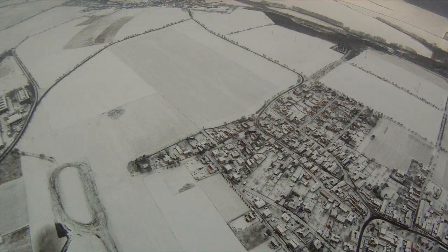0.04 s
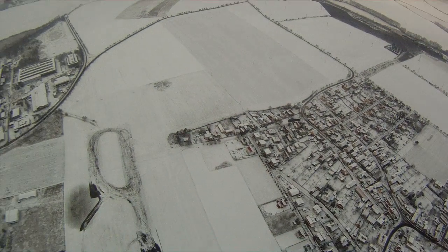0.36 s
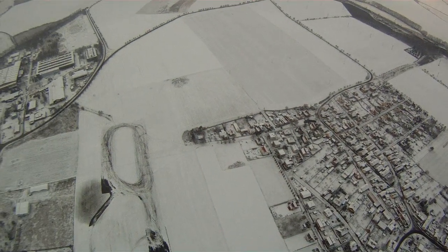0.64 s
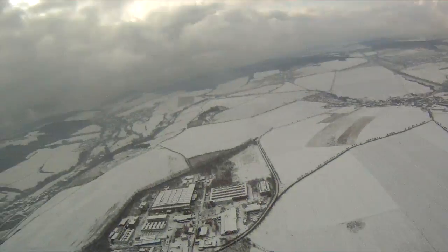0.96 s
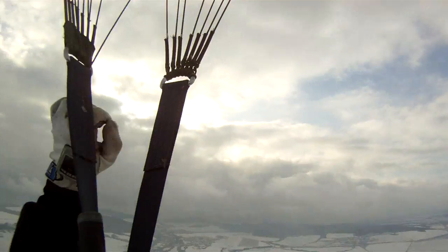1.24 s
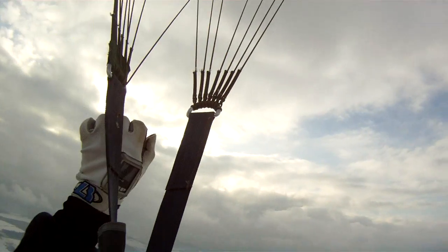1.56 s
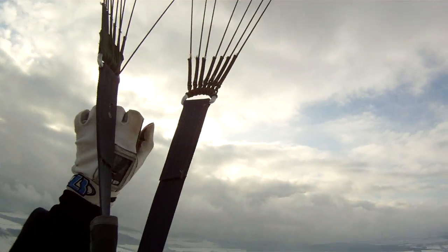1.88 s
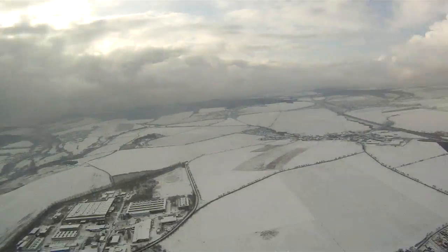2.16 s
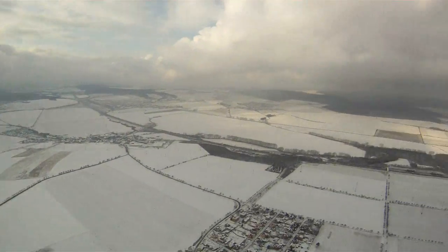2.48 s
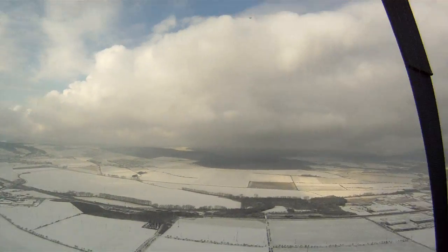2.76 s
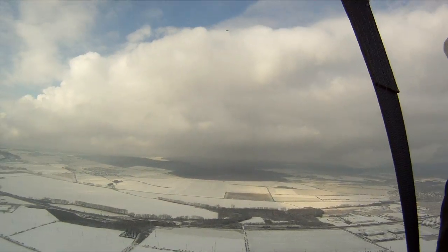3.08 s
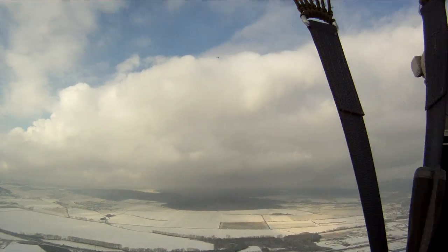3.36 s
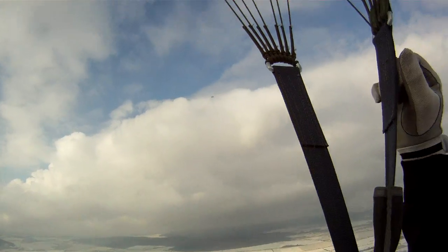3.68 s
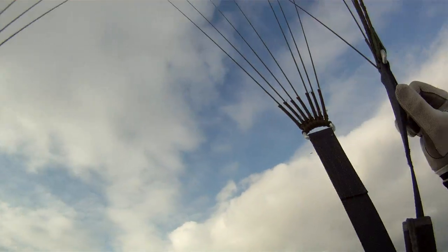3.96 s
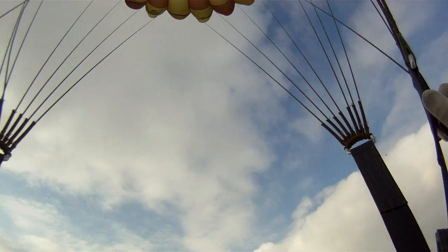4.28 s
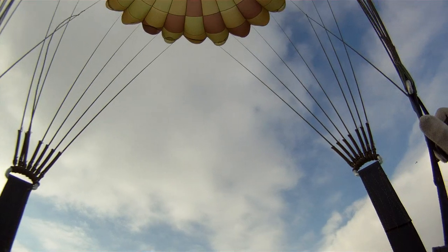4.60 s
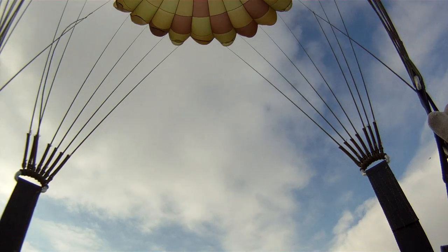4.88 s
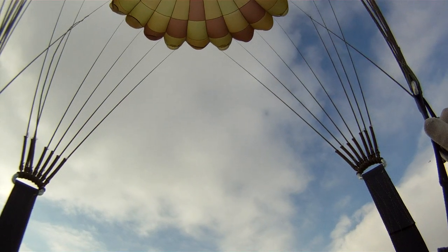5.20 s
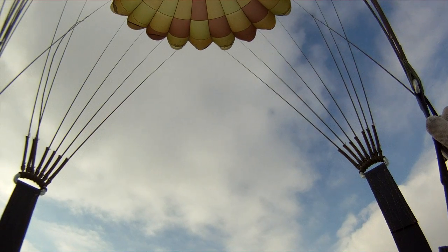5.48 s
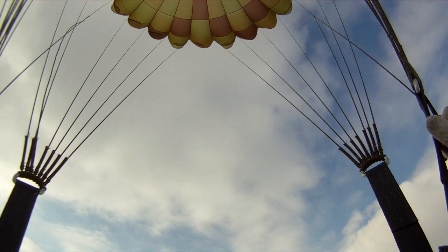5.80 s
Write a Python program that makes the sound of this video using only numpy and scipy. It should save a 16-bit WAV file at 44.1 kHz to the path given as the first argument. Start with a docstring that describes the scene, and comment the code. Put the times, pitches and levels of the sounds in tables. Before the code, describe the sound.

Gentle wind rumbles against an enclosed helmet microphone during a parachute glide, with no echo. Light jacket rustles, little strap snaps and tiny metal ticks come and go, and a far aircraft hums very faintly underneath. About four seconds in, gear knocks on the helmet and the airstream hits much harder, thumping, fluttering and hissing in two close surges before settling back to a soft rumble.

```python
"""A jacket rustles and straps snap over a soft rumble of air and a far aircraft's drone: a jumper
glides under an open parachute, heard from a camera in a closed housing on the helmet.
The cloth sounds by stick-slip friction as the head turns. When the head tips back, the airstream
catches the housing in two bursts: eddies buffet it with slow swings of pressure, and faster
turbulence drives the resonances of its shell into a rushing hiss."""
import sys
import numpy as np
from scipy import signal
from scipy.fft import rfft, irfft
from scipy.io import wavfile
from scipy.ndimage import uniform_filter1d

SR = 44100
rng = np.random.default_rng(int(sys.argv[2]) if len(sys.argv) > 2 else 0)


def transcribe(signal):
    """Save signal, clipped to [-1, 1], as a 16-bit WAV file at the path in sys.argv[1]."""
    frames = np.atleast_2d(signal).T
    limited = np.clip(frames, -1, 1)
    pcm = np.round(limited * 32767).astype(np.int16)
    wavfile.write(sys.argv[1], SR, pcm)


N = 257544
TIME = np.arange(N) / SR

# Gusts catching the housing; the last three levels are relative to the rush:
# (time of full strength [s], hold [s], rush level [dB], edge hiss [dB], hollow [dB], boom [dB])
GUST_EVENTS = [(0.952, .1, -60.5, -13, -3.5, 15.5), (3.757, 0.073, -59.5, -3, -8, 4),
               (3.878, 0.059, -46.5, -2.5, -1, 17.5), (3.961, 0.17, -52, 1.5, 0.5, 25),
               (4.145, 0.04, -53, -11, -3, 23), (4.332, 0.17, -57, -22, 5.5, 28),
               (4.394, 0.071, -46, -17.5, -3.5, 18), (4.629, .13, -57, -9.5, -4, 19)]
GUST_ATTACK_S, RUSH_RELEASE_S, RUSH_SAG_DB_PER_S = 0.035, 0.048, 13
BOOM_RELEASE_S, BOOM_SAG_DB_PER_S = 0.063, 17   # low turbulence eases sooner and lingers longer
GUST_EDDY_DB = -2.5   # slow eddies relative to the boom
# Breeze on the housing, stronger once the head is tipped back: (time [s], base level [dB])
BREEZE_CURVE = [(0, -53), (.16, -60), (.27, -48), (.55, -55), (.7, -46.5), (1.05, -46.5), (1.8, -51),
                (2.3, -47), (3.6, -49.5), (5.0, -43), (5.84, -46)]
BREEZE_EDDY_DB, BREEZE_BOOM_DB, EDDY_SPREAD_DB = -1.16, -4.5, 1.45   # relative to the base level
# Pitch of the boom, dropping as the head tips back: (time [s], frequency [Hz])
BOOM_CURVE = [(3.6, 105.1), (4.45, 96.1), (4.9, 88.86)]
# Vortex shedding, slowing as the gust eases: (time [s], level [dB], shedding rate [Hz])
SHEDDING_CURVE = [(3.84, -42.5, 159.2), (3.91, -32.5, 201), (3.96, -41, 184.7), (4.015, -32.5, 152),
                  (4.15, -43.5, 145.3), (4.26, -66, 137)]
# Single large eddies: (centre time [s], envelope peak [dB], frequency [Hz], half length [s])
BUFFET_EVENTS = [(.955, -40.5, 101, 0.019), (3.833, -9.5, 40.7, 0.0083), (3.866, -20.5, 22, 0.028),
                 (3.871, -15, 122, 0.016), (4.155, -12, 94.8, 0.014), (4.385, -15.5, 88.4, 0.0085),
                 (4.409, -16.5, 91.5, 0.011), (4.467, -22, 103, 0.012)]
# Rubs of the jacket: (time [s], hold [s], ring level [dB], ring centre [Hz], scratch re ring [dB])
JACKET_RUBS = [(0, 0.15, -63.5, 2310, 3.5), (.19, .29, -60.5, 2290, -.5), (0.523, 0.71, -72, 2240, 6),
               (.953, .075, -53, 2072, -6.5), (1.996, .05, -66, 2180, 0.5), (2.22, .09, -62, 2250, 0),
               (2.339, 0.21, -67, 2130, -4), (2.586, 0.31, -62.5, 2102, -5), (2.979, .5, -73.5, 2140, -10)]
RUB_ATTACK_S, RUB_RELEASE_S = 0.022, 0.0359

# Brief contacts: (time [s], peak level [dB])
STRAP_SNAPS = [(.072, -51), (.095, -45), (.224, -51), (.258, -44), (.298, -41.5), (.303, -44), (.342, -47),
               (.438, -51), (2.054, -47.5), (2.197, -46), (2.777, -48.5), (2.891, -47), (3.819, -39.5),
               (4.32, -52)]   # fabric and straps snapping
LINK_TICKS = [(1.072, -51.5), (2.383, -53), (2.453, -49), (3.82, -42), (4.967, -56)]   # small metal links of the harness
HELMET_KNOCKS = [(.181, -47.5), (1.521, -47.5), (3.871, -26)]   # gear against the helmet

# Resonances of the housing under each excitation: (frequency [Hz], width per pass [Hz], gain [dB])
EDDY_RESONANCES = [(24.2, 36, -5), (53.2, 19.5, -9)]
SHELL_RESONANCES = [(1162, 137, 1.5), (1500, 170, -3.5), (2040, 235, 2.5), (2197, 200, 3), (2580, 106, -8),
                    (3450, 380, -37), (4110, 480, -15), (4620, 250, -17), (4870, 240, -13.5)]
HOLLOW_RESONANCES = [(354, 110, -10), (658, 146, 1.5)]
EDGE_RESONANCES = [(2590, 280, -5), (3430, 240, -2.5), (4115, 160, -9), (4690, 200, -11.5), (4926, 210, -8),
                   (5200, 320, -18)]
CLOTH_RESONANCES = [(1194, 200, -4), (1287, 610, 1), (1800, 440, -12), (2550, 79, -4), (3580, 310, -11.5)]
SNAP_RESONANCES = [(1220, 330, -2), (2230, 350, 5), (3600, 750, -8.5), (4930, 520, -37)]
TICK_RESONANCES = [(3380, 1000, -2), (5300, 420, 1)]
KNOCK_RESONANCES = [(368, 200, 12), (742, 200, 17.5), (1180, 640, 13.5), (1970, 330, 7), (3400, 540, -22)]

# Smooth spectra of flow noise: (frequency [Hz], relative spectral density [dB])
CHURN_SPECTRUM = [(200, -19), (350, 0), (550, -7.5), (950, -6.5), (1700, -9.5), (2500, -24), (3000, -38),
                  (5500, -20)]   # fast air breaking up
WASH_SPECTRUM = [(130, 0), (200, -6.5), (260, -10.5), (350, -12.5), (520, -11.5), (620, -16.5), (780, -16),
                 (960, -19), (1170, -15), (1780, -23), (2250, -22.5), (2900, -26), (5200, -29), (6000, -31)]   # the even wash of the glide
WASH_START_DB, WASH_EASE_DB_PER_S = -57, 0.27
# Engine and propeller lines of the far aircraft: (frequency [Hz], mean level [dB])
AIRCRAFT_LINES = [(93.7, -60.5), (187.5, -65.5), (280.3, -70.5), (373, -77.5), (467, -78), (525, -86.5),
                  (543.5, -80), (678, -78.5)]
HOLD_HZ, CUTOFF_HZ = 12000, 15100   # the camera's sampling rate; upper limit of its output


def wind():
    """Turbulent pressure rocks the housing and makes it boom; vortex shedding adds a flutter."""
    _, _, rush_db, _, _, boom_db = np.transpose(GUST_EVENTS)
    breeze_db, = in_time(BREEZE_CURVE)
    boom_hz, = in_time(BOOM_CURVE)
    flutter_db, shedding_hz = in_time(SHEDDING_CURVE)
    gusts = gust_gain(rush_db + boom_db, BOOM_RELEASE_S, BOOM_SAG_DB_PER_S)
    uneven_breeze = from_db(breeze_db + BREEZE_EDDY_DB + EDDY_SPREAD_DB * drift(4.3))
    eddy_gain = np.hypot(uneven_breeze, from_db(GUST_EDDY_DB) * gusts)
    boom_gain = np.hypot(from_db(breeze_db + BREEZE_BOOM_DB), gusts)
    flutter_gain = during(SHEDDING_CURVE) * from_db(flutter_db)
    eddies = eddy_gain * evened(low_noise(EDDY_RESONANCES, top_hz=94.84), window_s=0.2)
    boom = boom_gain * evened(moving_ring(boom_hz, half_width_hz=15.6), window_s=0.073)
    flutter = flutter_gain * evened(moving_ring(shedding_hz, half_width_hz=22), window_s=0.055)
    return eddies + boom + flutter


def buffets():
    """A large passing eddy is a wave packet: the pressure swings for a cycle or a few."""
    pressure = np.zeros(N)
    for centre_s, db, hz, half_s in BUFFET_EVENTS:
        t = TIME - centre_s
        envelope = from_db(db) * np.exp(-(t / half_s) ** 2)
        pressure -= envelope * np.sin(2 * np.pi * hz * t)
    return pressure


def rush():
    """Forced resonance: fast air rings the shell and its hollow, breaks up and hisses on an edge."""
    _, _, rush_db, edge_db, hollow_db, _ = np.transpose(GUST_EVENTS)
    shell = unit_rms(body(turbulence(spread_db=1.6, rate_hz=19), SHELL_RESONANCES))
    hollow = evened(body(rng.standard_normal(N), HOLLOW_RESONANCES), window_s=0.058)
    churn = coloured(turbulence(spread_db=-1.5, rate_hz=44), CHURN_SPECTRUM)
    edge = unit_rms(body(turbulence(spread_db=2.0, rate_hz=15), EDGE_RESONANCES))
    return sum(gust_gain(rush_db + db, RUSH_RELEASE_S, RUSH_SAG_DB_PER_S) * layer
               for db, layer in [(0, shell), (hollow_db, hollow), (edge_db, edge + churn)])


def jacket_rustle():
    """Stick-slip friction: cloth moves in tiny jerks, and its ring shifts with each rub's contact."""
    _, _, _, ring_hz, scratch_db = np.transpose(JACKET_RUBS)
    rub_power = np.array([from_db(db) * swell(full_s, hold_s, RUB_ATTACK_S, RUB_RELEASE_S)
                          for full_s, hold_s, db, *_ in JACKET_RUBS]) ** 2
    ring_power = rub_power.sum(axis=0)
    scratch_power = from_db(scratch_db) ** 2 @ rub_power
    centre_hz = ring_hz @ rub_power / ring_power   # the strongest rub leads the pitch
    slips = unit_rms(from_db(2.4 * drift(140)))
    core = moving_ring(centre_hz, half_width_hz=68)
    skirt = from_db(-1.0) * moving_ring(centre_hz, half_width_hz=300)
    ring = unit_rms(core + skirt)
    scratch = unit_rms(body(rng.standard_normal(N), CLOTH_RESONANCES))
    return slips * (np.sqrt(ring_power) * ring + np.sqrt(scratch_power) * scratch)


def impacts(events, modes, decay_s):
    """Impact excitation: each contact sends a short, dying noise into the housing's resonances."""
    out, size = np.zeros(N), SR // 10
    decay = np.exp(-np.arange(size) / (decay_s * SR))
    for time_s, db in events:
        hit = body(rng.standard_normal(size) * decay, modes)
        start = int(time_s * SR)
        out[start:start + size] += from_db(db) * hit / np.abs(hit).max()
    return out


def air_wash():
    """Broadband flow noise: gliding through the air makes an even wash that slowly eases."""
    gain = from_db(WASH_START_DB - WASH_EASE_DB_PER_S * TIME)
    return gain * coloured(turbulence(spread_db=0.67, rate_hz=140), WASH_SPECTRUM)


def aircraft(waver_hz, fading_db):
    """Atmospheric fading: a far engine's lines waver in level and pitch on their way through the air."""
    drone = np.zeros(N)
    for hz, db in AIRCRAFT_LINES:
        amplitude = np.sqrt(2) * from_db(db + fading_db * drift(1.8))
        phase = 2 * np.pi * np.cumsum(hz + waver_hz * drift(4.53)) / SR
        drone += amplitude * np.sin(phase)
    return drone


def gust_gain(levels_db, release_s, sag_db_per_s):
    """Incoherent addition: the gusts, each at its own level, sum in power."""
    gains = [from_db(db) * swell(full_s, hold_s, GUST_ATTACK_S, release_s, sag_db_per_s)
             for (full_s, hold_s, *_), db in zip(GUST_EVENTS, levels_db)]
    return np.sqrt(sum(gain ** 2 for gain in gains))


def swell(full_s, hold_s, attack_s, release_s, sag_db_per_s=0):
    """Exponential envelope, set by time constants: it grows until full_s, sags in the hold, then dies."""
    early = np.maximum(full_s - TIME, 0)
    late = np.maximum(TIME - full_s - hold_s, 0)
    sag = from_db(-sag_db_per_s * np.clip(TIME - full_s, 0, hold_s))
    return sag * np.exp(-np.minimum(early / attack_s + late / release_s, 20))


def turbulence(spread_db, rate_hz):
    """Intermittency: white noise comes in lumps as its level drifts; rms 1."""
    return unit_rms(rng.standard_normal(N) * from_db(spread_db * drift(rate_hz)))


def low_noise(modes, top_hz):
    """Random forcing of low resonances, low-passed to stay dark above them."""
    lowpass = signal.butter(8, top_hz, fs=SR, output="sos")
    return signal.sosfilt(lowpass, body(rng.standard_normal(N), modes))


def moving_ring(centre_hz, half_width_hz):
    """Narrowband noise about a moving centre: amplitude and phase wander as the width allows; rms 1."""
    lowpass = signal.butter(2, half_width_hz, fs=SR, output="sos")
    in_phase, quadrature = signal.sosfilt(lowpass, rng.standard_normal((2, N)))
    phase = 2 * np.pi * np.cumsum(centre_hz) / SR
    return unit_rms(in_phase * np.cos(phase) + quadrature * np.sin(phase))


def body(x, modes):
    """Modal superposition: parallel resonances, each passed twice to keep the valleys dark."""
    return sum(from_db(db) * resonate(resonate(x, hz, width), hz, width) for hz, width, db in modes)


def resonate(x, hz, width_hz):
    """A damped two-pole resonator with unit gain at its peak."""
    radius = np.exp(-np.pi * width_hz / SR)
    feedforward = np.array([1, 0, -1]) * (1 - radius ** 2) / 2
    feedback = [1, -2 * radius * np.cos(2 * np.pi * hz / SR), radius ** 2]
    return signal.lfilter(feedforward, feedback, x + 1e-18)


def coloured(x, spectrum):
    """Spectral shaping by a smooth curve, falling 12 dB per octave beyond its ends; rms 1."""
    hz, db = np.transpose(spectrum)
    bin_hz = np.maximum(np.arange(N // 2 + 1) * SR / N, 1)
    gain = from_db(np.interp(np.log(bin_hz), np.log(hz), db))
    rolloff = np.minimum(bin_hz / hz[0], 1) ** 2 * np.minimum(hz[-1] / bin_hz, 1) ** 2
    return unit_rms(irfft(rfft(x) * gain * rolloff, N))


def drift(rate_hz):
    """Random modulation: noise low-passed at rate_hz, with a spread of 1."""
    step, settling = 40, 2000   # samples per slow step; steps for the filter to settle
    pole = np.exp(-2 * np.pi * rate_hz * step / SR)
    noise = rng.standard_normal(N // step + settling + 2)
    slow = signal.lfilter([1], [1, -2 * pole, pole ** 2], noise)[settling:]
    return np.interp(np.arange(N) / step, np.arange(len(slow)), unit_rms(slow))


def evened(x, window_s):
    """Division by the running rms holds a noise at an even strength; rms 1."""
    power = uniform_filter1d(x * x, max(int(window_s * SR), 1))
    return unit_rms(x / np.sqrt(np.abs(power) + 1e-20))


def in_time(curve):
    """Linear interpolation of each column of a curve, sample by sample."""
    times, *columns = np.transpose(curve)
    return [np.interp(TIME, times, column) for column in columns]


def during(curve, fade_s=0.05):
    """A trapezoidal gate: one while a curve lasts, fading outside its ends."""
    start, end = curve[0][0], curve[-1][0]
    return np.interp(TIME, [start - fade_s, start, end, end + fade_s], [0, 1, 1, 0])


def unit_rms(x):
    """Normalisation to unit power."""
    return x / np.sqrt(np.mean(x ** 2) + 1e-20)


def from_db(db):
    """Decibels as an amplitude ratio."""
    return 10 ** (np.asarray(db) / 20)


def scene():
    """Free-field superposition: all sources add at one microphone, with no room around it."""
    snaps = impacts(STRAP_SNAPS, SNAP_RESONANCES, decay_s=0.0043)
    ticks = impacts(LINK_TICKS, TICK_RESONANCES, decay_s=0.0005)
    knocks = impacts(HELMET_KNOCKS, KNOCK_RESONANCES, decay_s=0.0077)
    background = air_wash() + aircraft(waver_hz=0.66, fading_db=2.5)
    return (wind() + buffets() + rush() + jacket_rustle() + snaps + ticks + knocks + background)[None]


def record(dry):
    """Spectral imaging: the camera's low-rate sample-and-hold mirrors the sound into a thin sheen."""
    anti_alias = signal.butter(8, 5900, fs=SR, output="sos")
    band = signal.sosfiltfilt(anti_alias, dry)
    sampled = signal.resample_poly(band, HOLD_HZ, SR, axis=-1)
    held = np.repeat(sampled, 4, axis=-1)
    mirrored = signal.resample_poly(held, SR, 4 * HOLD_HZ, axis=-1)[:, :N]
    treble_limit = signal.ellip(12, .1, 80, CUTOFF_HZ, fs=SR, output="sos")
    return signal.sosfilt(treble_limit, mirrored)


dry = scene()
out = record(dry)
transcribe(out)
```